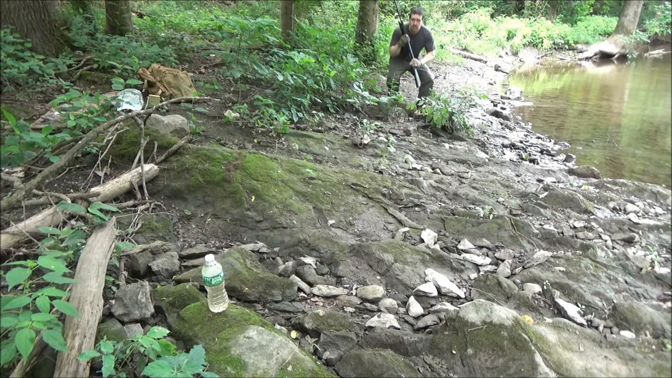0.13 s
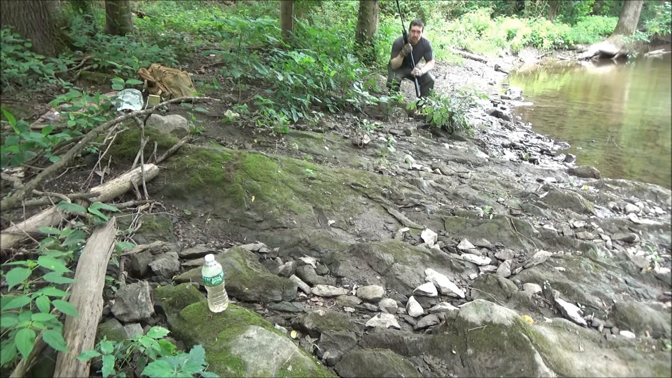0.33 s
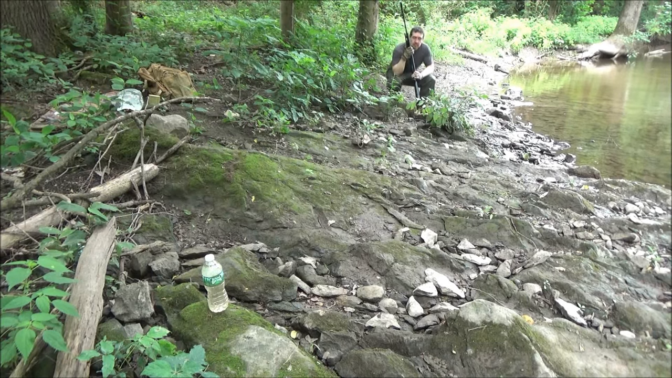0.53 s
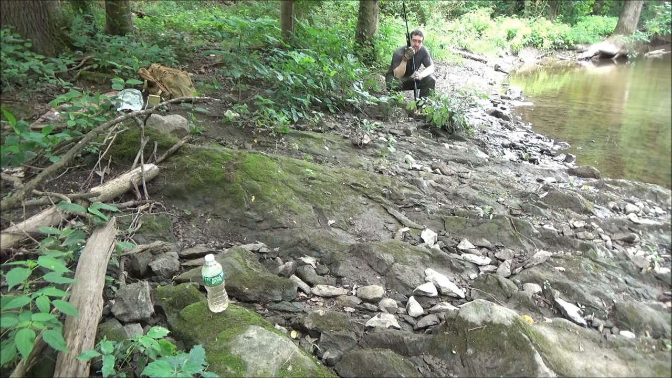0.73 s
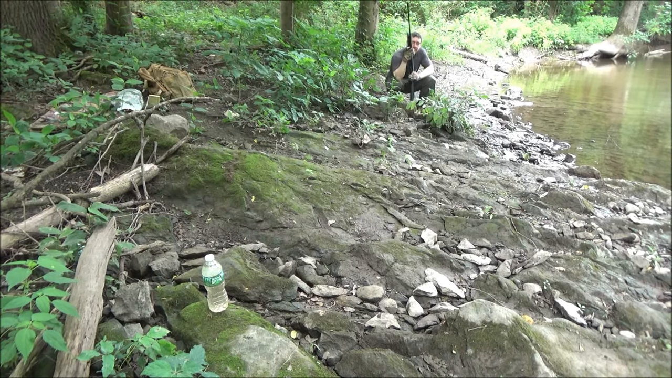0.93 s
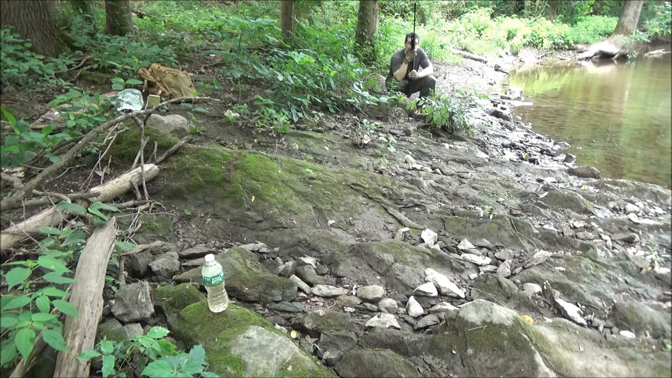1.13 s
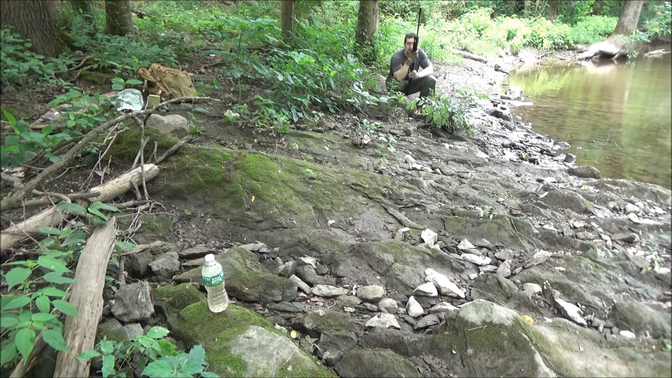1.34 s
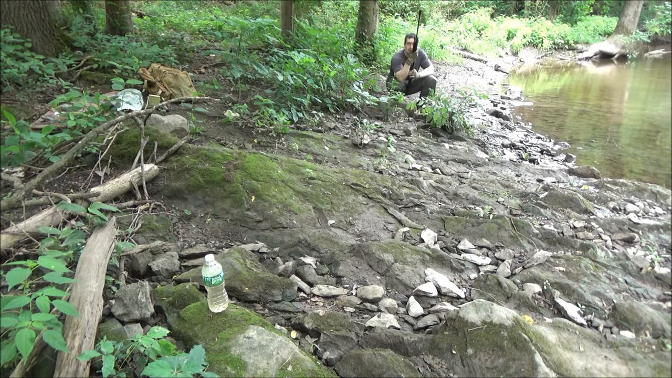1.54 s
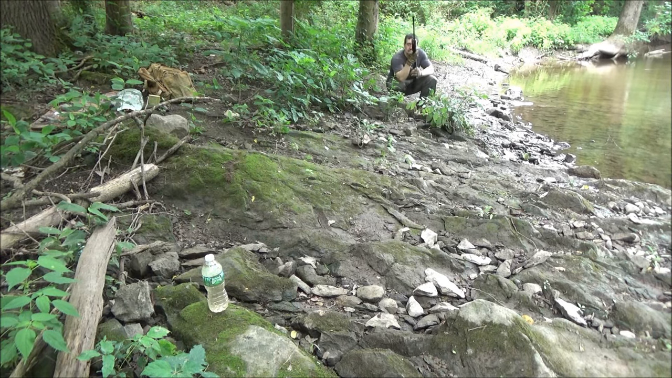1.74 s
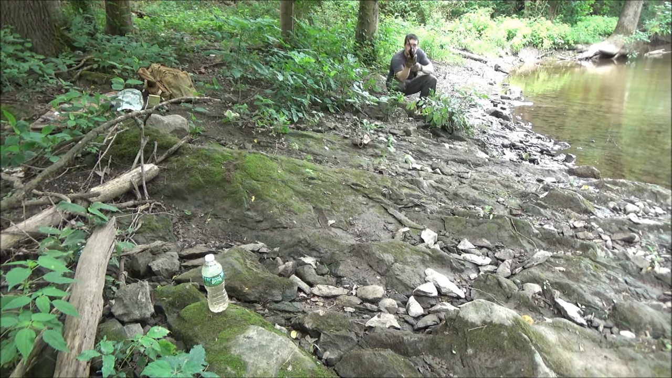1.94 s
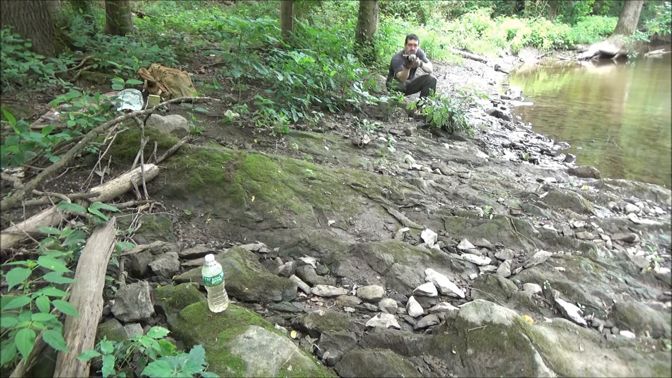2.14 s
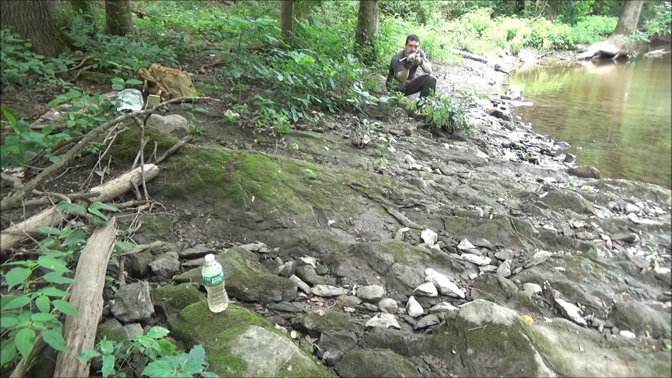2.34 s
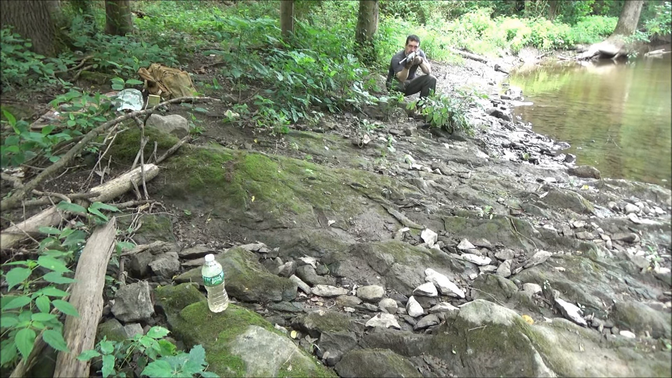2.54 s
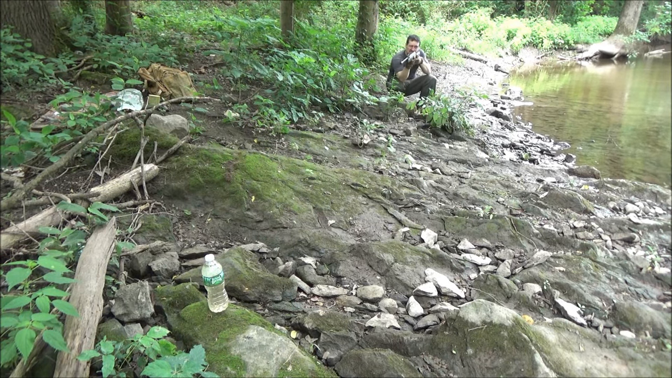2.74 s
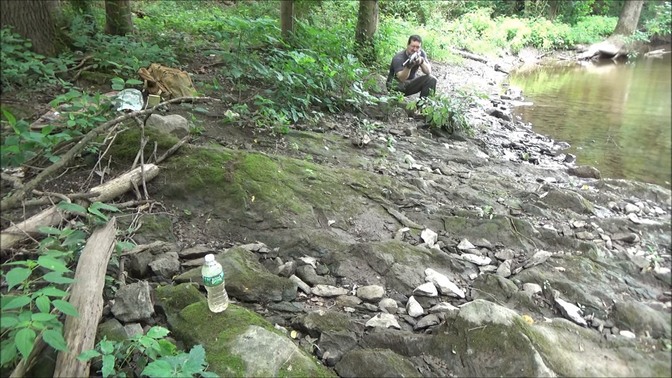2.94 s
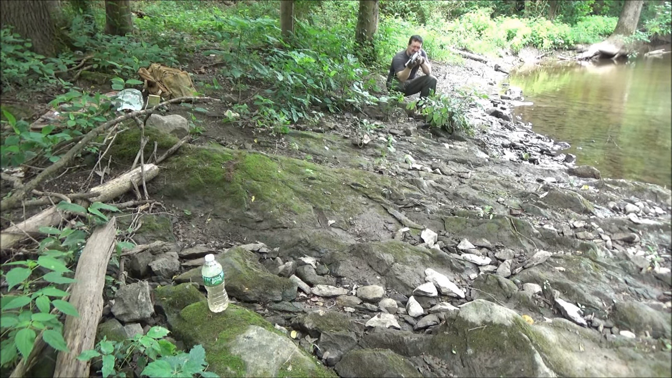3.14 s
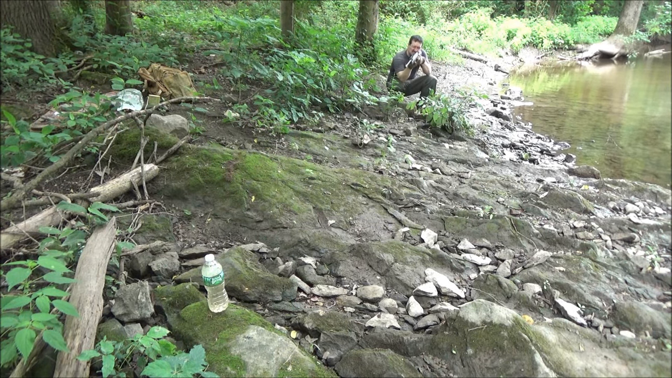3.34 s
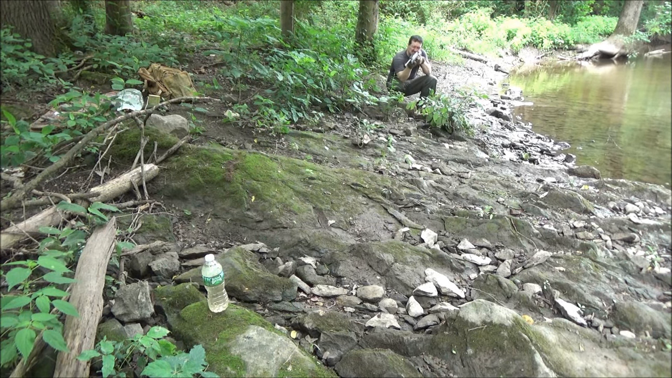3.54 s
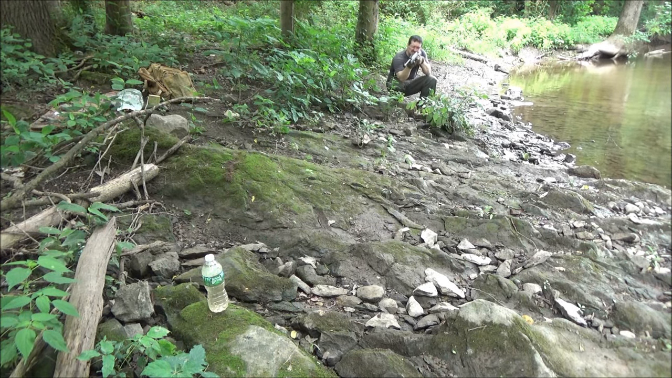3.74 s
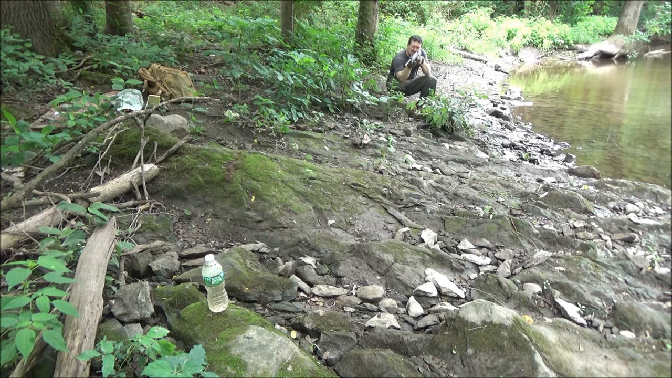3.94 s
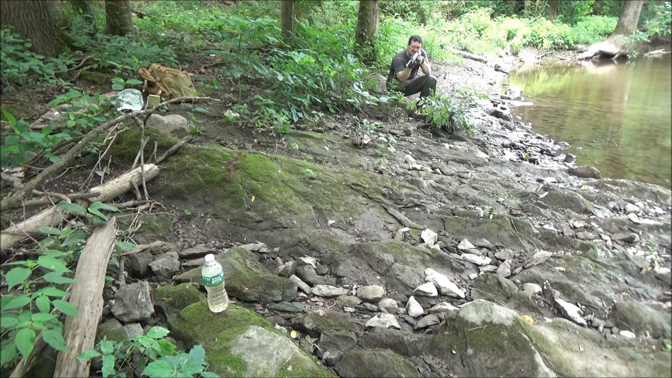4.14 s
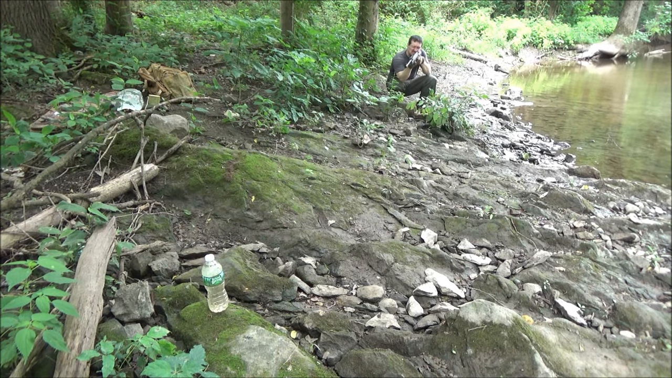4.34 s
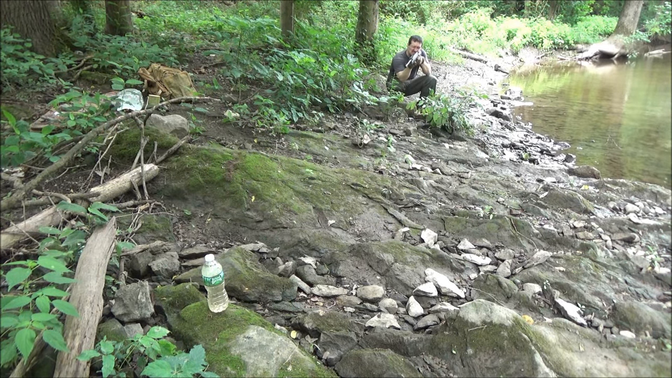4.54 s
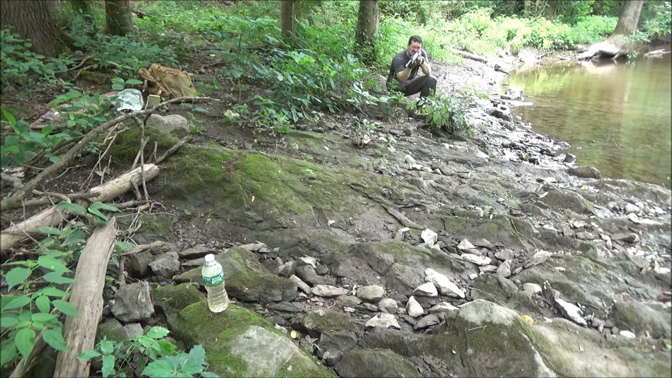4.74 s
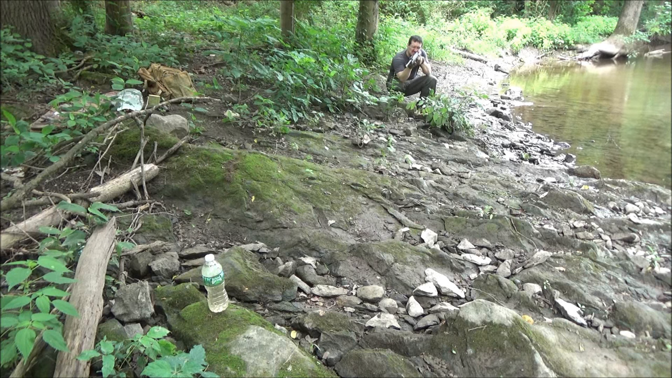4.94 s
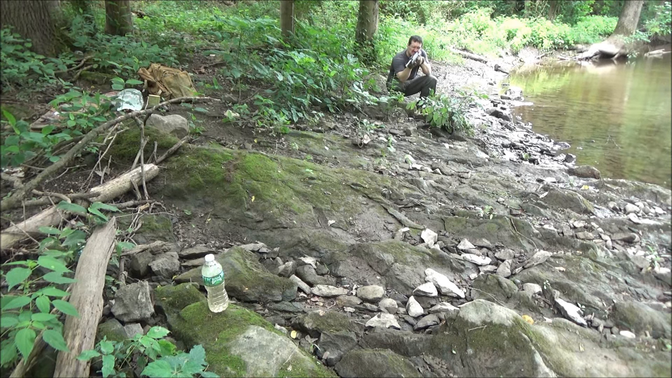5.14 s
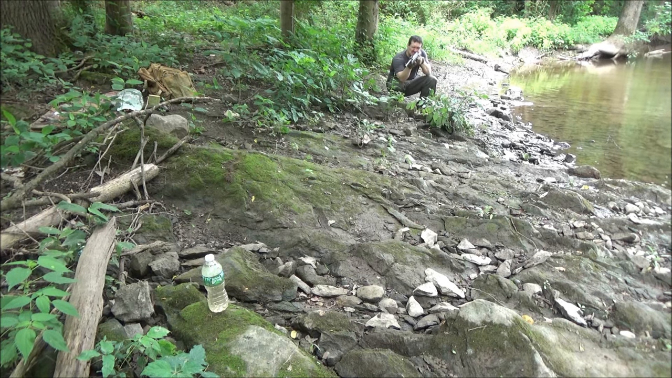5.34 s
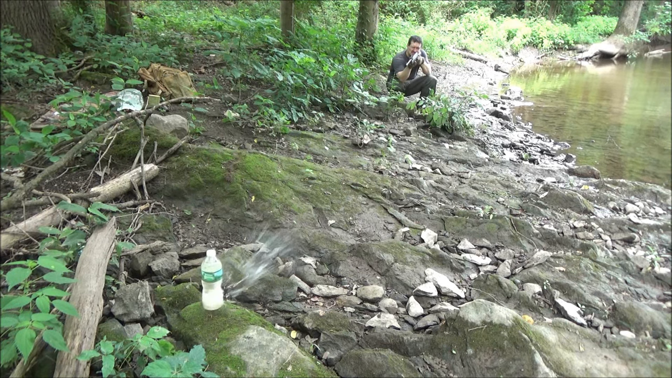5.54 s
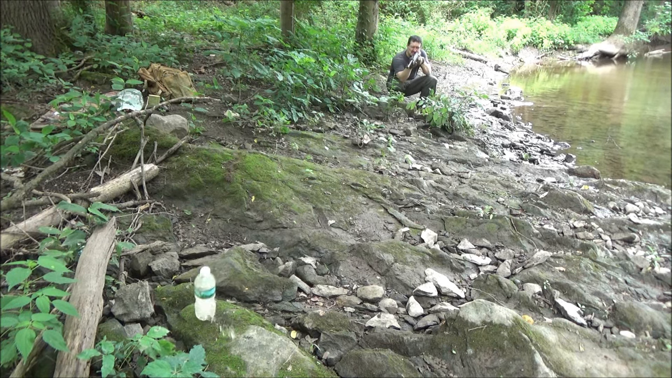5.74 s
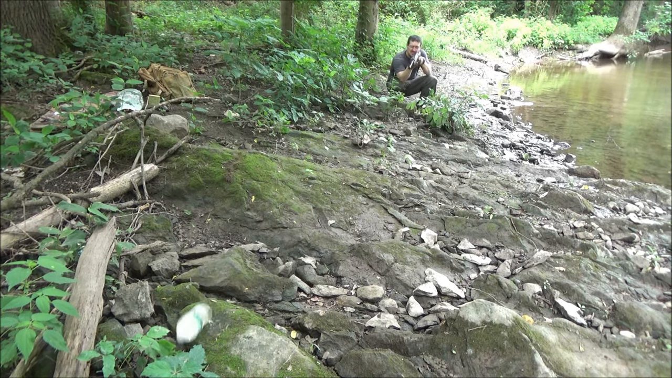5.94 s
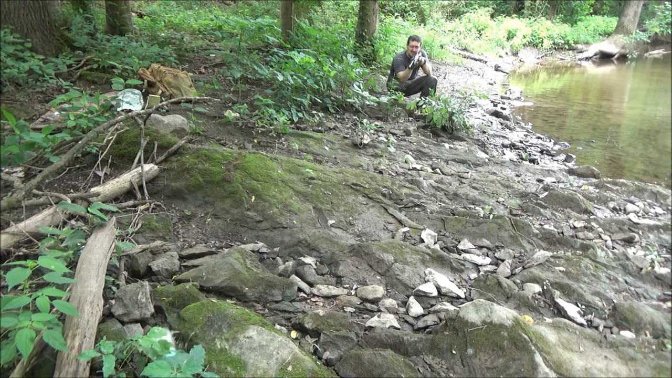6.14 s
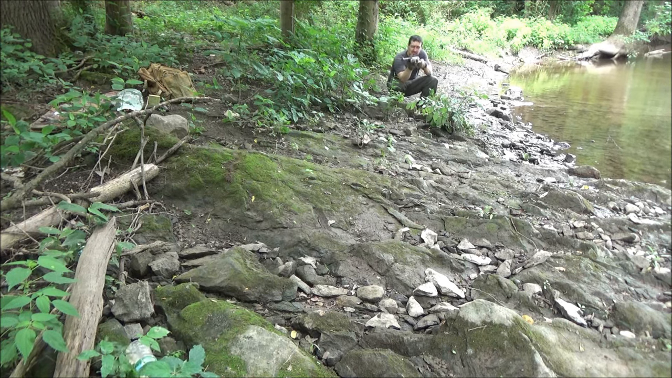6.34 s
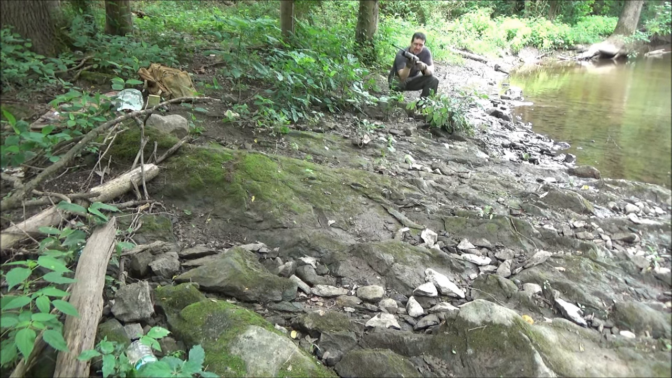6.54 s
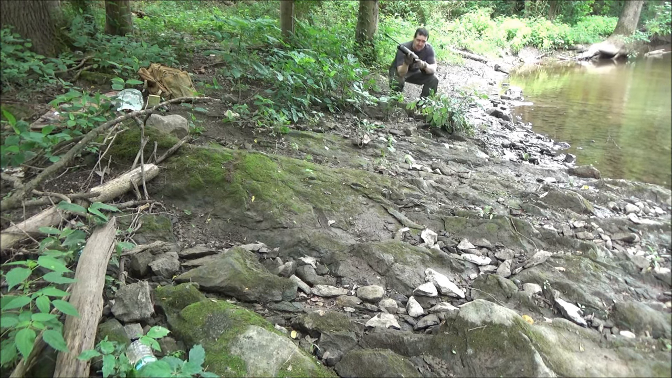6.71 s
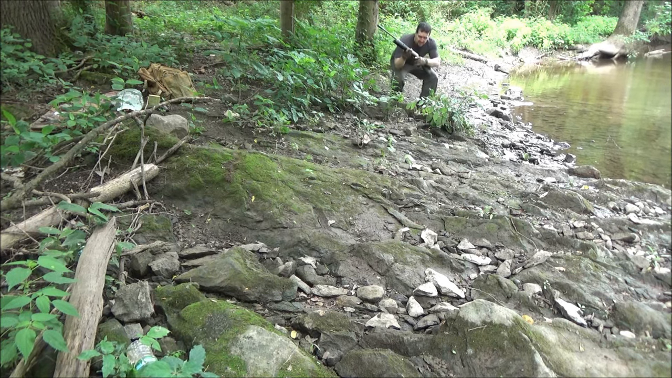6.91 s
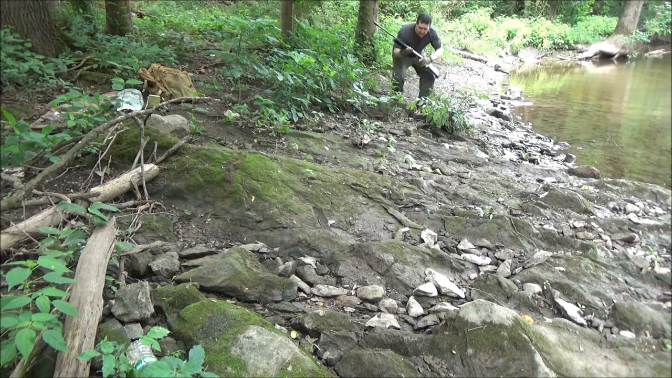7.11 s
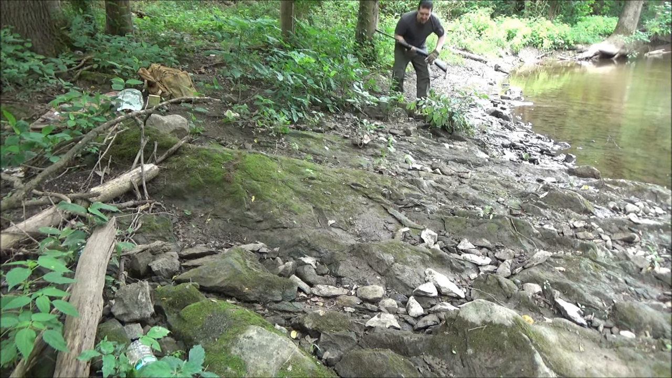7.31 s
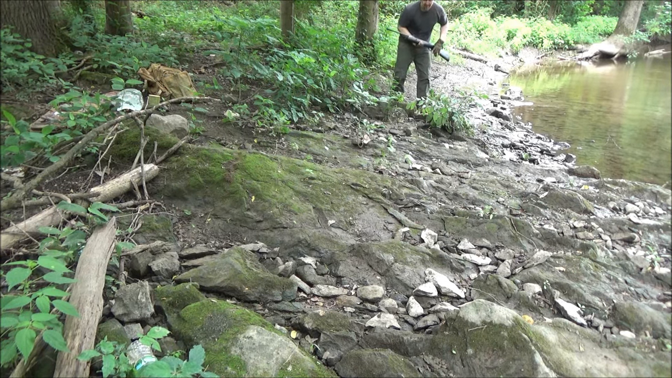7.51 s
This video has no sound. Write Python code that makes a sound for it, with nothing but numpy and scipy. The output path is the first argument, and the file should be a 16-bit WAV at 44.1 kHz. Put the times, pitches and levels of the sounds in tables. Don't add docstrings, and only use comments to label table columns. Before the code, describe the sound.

A steady creek rush and echoing woodland birds, then a violent clipped air rifle crack, a plastic bottle rattling over stone, fine spray and drips.

```python
import sys
import numpy as np
from scipy import signal
from scipy.fft import rfft, irfft, next_fast_len
from scipy.io import wavfile
from scipy.ndimage import uniform_filter1d, map_coordinates

SR = 44100
rng = np.random.default_rng(int(sys.argv[2]) if len(sys.argv) > 2 else 0)


def bounce(signal):
    frames = np.transpose(np.atleast_2d(signal))
    limited = np.clip(frames, -1, 1)
    pcm = np.round(limited * 32767).astype(np.int16)
    wavfile.write(sys.argv[1], SR, pcm)


def boost(x):
    u = np.asarray(x, float) / 20
    return 10 ** u


N = 333837


def unit(x):
    return x / np.sqrt(np.mean(x ** 2) + 1e-20)


def along(points, hz):
    f, v = np.transpose(points)
    return np.interp(np.log(hz + 1), np.log(f + 1), v)


def add(track, start_s, sound):
    part = track[round(start_s * SR):][:len(sound)]
    part += sound[:len(part)]


def filtered(x, response):
    m = next_fast_len(len(x) + 4096)
    return irfft(rfft(x, m) * response(np.fft.rfftfreq(m, 1 / SR)), m)[:len(x)]


def resonance(hz, centre_hz, width_hz):
    return 1j * hz * width_hz / (centre_hz ** 2 - hz ** 2 + 1j * hz * width_hz)


def wobble(length, rate_hz):
    knots = rng.standard_normal(int(length * rate_hz / SR) + 4)
    return map_coordinates(knots, [np.arange(length) * rate_hz / SR])


def lumpy(shape, bins, frames):
    field = uniform_filter1d(rng.standard_normal(shape), size=bins, axis=0)
    return unit(uniform_filter1d(field, size=frames, axis=1))


def dying_noise(t60s, patchy_db, length):
    hz, t, z = signal.stft(rng.standard_normal(length), SR, nperseg=256, noverlap=128)
    level_db = patchy_db * lumpy(z.shape, 8, 5) - 60 * t / along(t60s, hz)[:, None]
    return signal.istft(z * boost(level_db), SR, nperseg=256, noverlap=128)[1]


# (freq_hz, t60_s)
WOOD_T60 = [(300, 0.66), (2000, 1.16), (6500, 1.13), (12000, 0.59)]


def in_wood(track, start_s, sound, wet_db):
    tail = dying_noise(WOOD_T60, patchy_db=0.5, length=3 * SR // 4)
    add(track, start_s, sound)
    add(track, start_s + .004, boost(wet_db) * signal.fftconvolve(sound, tail / np.linalg.norm(tail)))


# (freq_hz, density_db per Hz)
RUSH_COLOUR = [(15, -43), (25, -13.5), (70, -4), (120, -7), (149, -3.5), (429, -9.5), (466, -8), (594, -5),
               (917, -0.5), (2710, -10.5), (2940, -7.5), (4180, -27), (5940, -29), (8000, -34.5),
               (16200, -38.5)]
# (time_s, level_db)
FLOW = [(0, 1), (.6, .5), (2, -.5), (3.5, -.5), (4.5, -1), (5.3, 0), (6.3, -1), (6.6, -1.5), (7.57, 0)]


def creek():
    z = signal.stft(rng.standard_normal(N + 512), nperseg=512)[2]
    rush = signal.istft(z * boost(0.88 * lumpy(z.shape, 5, 10)), nperseg=512)[1][:N]
    hiss_bump = lambda hz: 1 + .5 * abs(resonance(hz, 6084, 1160)) ** 2
    rush = unit(filtered(rush, lambda hz: boost(along(RUSH_COLOUR, hz)) * hiss_bump(hz)))

    count, length = 6000, 700
    start = (rng.random((count, 1)) * N).astype(int) + np.arange(length)
    pitch_hz = 950 * np.exp(0.391 * rng.standard_normal((count, 1)))
    size = boost(3 * rng.exponential(size=(count, 1)))
    cycles = pitch_hz * np.arange(length) / SR
    ring = np.sin(2 * np.pi * cycles * (1 + .012 * cycles))
    bubble = size * cycles * np.exp(-cycles / 2.25) * ring
    babble = unit(np.bincount(start.ravel(), bubble.ravel())[:N])

    flow_db = np.interp(np.arange(N) / SR, *np.transpose(FLOW))
    return (boost(-18.0) * rush + boost(-29.5) * babble) * boost(flow_db)


# (freq_hz, rms_db)
WHINE = [(63, -43), (15734, -63)]


def whine():
    t = np.arange(N) / SR
    return sum(np.sqrt(2) * boost(db) * np.sin(2 * np.pi * hz * t) for hz, db in WHINE)


def song(notes, slide, waver, flutter_db, wet_db):
    out = np.zeros(N)
    for start_s, length_s, middle_hz, level_db in notes:
        shake, flutter = wobble(SR // 2, 150), wobble(SR // 2, 55)
        u = np.linspace(0, 1, round(length_s * SR))
        arch = 0.01487 * (2 * u - 1) ** 2
        hz = middle_hz * (1 + slide * (u - .5) - arch + waver * shake[:len(u)])
        swell = np.sin(np.pi * u) ** .5 * unit(boost(flutter_db * flutter[:len(u)]))
        note = swell * np.sin(2 * np.pi * np.cumsum(hz) / SR)
        in_wood(out, start_s, boost(level_db + 4.5) * note, wet_db)
    return out


FALL, RISE = 0.1344, 0.122
FALLING = [(.308, 0.0254, 3135, -21), (1.206, 0.0233, 3160, -24), (1.717, 0.027, 3000, -23.5),
           (1.754, 0.022, 2953, -19.5), (1.928, .045, 2760, -24), (2.848, .032, 2980, -22.5),
           (2.95, .04, 2620, -21.5), (3.296, 0.02, 3180, -21.5), (3.597, 0.0366, 2915, -22.5),
           (3.828, 0.0271, 3260, -22.5), (4.227, .048, 2380, -28), (4.755, 0.033, 3153, -22.5),
           (4.9, .07, 7500, -38), (5.219, 0.036, 2630, -28)]
RISING = [(1.275, 0.028, 3200, -32.5), (1.992, 0.088, 2666, -25), (2.419, 0.1076, 2353, -24.5),
          (3.421, 0.0426, 3350, -29.5), (3.885, 0.024, 3180, -22), (4.103, 0.09, 2518, -27),
          (5.05, .025, 8400, -41), (5.56, .042, 2900, -21.5)]
HELD = [(.09, 0.019, 3250, -25), (.122, 0.0174, 3310, -28), (.258, 0.021, 3210, -19.5),
        (1.075, 0.11, 2550, -23), (1.79, .03, 2765, -29), (1.832, 0.0308, 2740, -25),
        (1.965, 0.025, 2560, -20), (2.619, 0.054, 2415, -30), (2.692, 0.0504, 3400, -27),
        (2.804, 0.0142, 3060, -22), (2.905, 0.035, 2870, -19.5), (2.99, .1, 2537, -28.5),
        (3.032, 0.077, 2869, -29), (3.49, 0.093, 3490, -37), (3.74, .042, 3485, -34),
        (4.2, 0.126, 2580, -29), (4.83, .033, 3320, -28.5), (5.155, .065, 2885, -26.5)]
SEEPS = [(1.869, .06, 5930, -43.5), (2.906, .08, 6940, -50), (3.28, 0.107, 7080, -45),
         (3.503, 0.45, 7790, -50), (4.479, .16, 7100, -54), (4.81, .05, 8950, -50),
         (4.954, 0.153, 7185, -35.5), (7.17, .06, 7450, -49), (7.38, .18, 7400, -52)]
TRILLS = [(.04, .075, 4130, -44.5), (.09, .071, 4390, -51.5), (.21, 0.081, 4100, -44),
          (.29, .06, 3110, -29), (1.26, 0.039, 3200, -29.5), (2.63, 0.063, 4150, -43),
          (2.99, 0.147, 4050, -42), (3.83, 0.11, 3400, -34), (4.83, 0.074, 3240, -33),
          (5.5, 0.059, 3820, -38.5)]
SINKING = [(2.69, 0.0514, 3800, -38), (2.74, 0.067, 3520, -31.5), (3.24, 0.04236, 3100, -24.5),
           (4.74, .05, 3820, -38)]


def birds():
    clear = dict(waver=.008, flutter_db=2.5, wet_db=-1.5)
    warbling = dict(waver=.045, flutter_db=5, wet_db=2)
    whistler = song(FALLING, -FALL, **clear) + song(RISING, RISE, **clear) + song(HELD + SEEPS, 0, **clear)
    return whistler + song(TRILLS, 0, **warbling) + song(SINKING, -FALL, **warbling)


# (start_s, peak_db, top_hz)
CHIPS = [(0.736, -12.5, 6485), (2.079, -10.5, 6561), (2.4877, -11.5, 6600), (3.364, -12.5, 6520),
         (4.8822, -12, 6370)]


def chips():
    out, u = np.zeros(N), np.linspace(0, 1, 1000)
    slur = 1 - .065 * (1 + np.cos(np.pi * np.clip(u / .65, 0, 1))) - .3 * np.exp(-u / .042)
    swell = np.sin(np.pi * u) ** 0.64 * boost(7.42 * (u - 1))
    for start_s, peak_db, top_hz in CHIPS:
        phase = 2 * np.pi * np.cumsum(top_hz * slur) / SR
        lines = np.sin(phase) + boost(-6.5) * np.sin(phase / 2) + boost(-33) * np.sin(3 * phase / 2)
        run_up = np.sin(2 * np.pi * np.cumsum(top_hz * (0.5 + 2.2 * u)) / SR)
        call = swell * lines + boost(-14) * np.exp(-(u / .07 - 1) ** 2) * run_up
        in_wood(out, start_s - .012, boost(peak_db - 6.5) * call, wet_db=12.0)
    return out


# (start_s, peak_db, centre_hz, width_share of centre, echo_db)
SNAPS = [(1.95, -40, 12000, .5, 8), (2.04, -28, 4400, .35, 3.5), (4.045, -30, 9000, .5, -5),
         (5.0227, -5, 3150, 0.17, -14), (5.023, -33, 8000, 1.2, -10), (6.736, -7, 2300, .3, 0),
         (6.735, -7.5, 4770, .9, 0)]


def snaps():
    out, t = np.zeros(N), np.arange(SR // 50) / SR
    for start_s, peak_db, centre_hz, width_share, echo_db in SNAPS:
        burst = boost(-60 * t / .014) * rng.standard_normal(len(t))
        burst = filtered(burst, lambda hz: resonance(hz, centre_hz, width_share * centre_hz) ** 2)
        in_wood(out, start_s, boost(peak_db) * burst / np.abs(burst).max(), echo_db)
    return out


# (start_s, ring_db, ring_hz, t60_s, crack_db)
SHOT = [(5.618, 6.5, 1147, .039, -22), (5.62, 1, 2575, .042, -4), (5.622, 5.5, 5652, 0.048, 1),
        (5.6246, 5, 6100, .016, -2), (5.6294, 24.5, 2487, 0.0118, 18), (5.6377, 28.5, 1590, 0.0055, 21.5),
        (5.6403, 6, 2800, .03, 0.5)]
# (start_s, level_db)
PUSHES = [
    (5.6294, 24.5),
    (5.6382, 10),
]
# (freq_hz, density_db per Hz)
ROLL_COLOUR = [(88, -57), (150, -26), (392, -10), (557, -10.5), (627, -8), (983, -6.5), (1130, -6.5),
               (3380, 3), (4030, -8), (6200, -3), (16200, -21)]
# (freq_hz, t60_s)
ROLL_T60 = [(300, 2.86), (1500, 2.1), (3000, 1.6), (7000, 1.27), (14000, 0.74)]


def shot():
    out, t = np.zeros(N), np.arange(SR // 10) / SR
    for start_s, ring_db, ring_hz, t60_s, crack_db in SHOT:
        noise = rng.standard_normal((2, len(t)))
        wander = 1.13 * np.cumsum(noise[0]) * np.sqrt(ring_hz / SR)
        ring = np.sin(2 * np.pi * ring_hz * t + wander)
        crack = filtered(noise[1], lambda hz: resonance(hz, 4600, 7000))
        blow = boost(ring_db) * ring + boost(crack_db) * crack
        add(out, start_s, blow * boost(-60 * t / t60_s) * (1 - np.exp(-t / 0.00063)))
    for start_s, level_db in PUSHES:
        add(out, start_s, -boost(level_db) * (1 - t / 0.00054) * np.exp(-t / 0.00041))

    roll = dying_noise(ROLL_T60, patchy_db=1.4, length=2 * SR)
    roll = filtered(roll, lambda hz: boost(along(ROLL_COLOUR, hz)))
    onset = 1 - np.exp(-np.arange(len(roll)) / SR / 0.0022)
    add(out, 5.641, boost(7) * roll / np.std(roll[:SR // 10]) * onset)
    thump = np.sin(2 * np.pi * 70 * t) * boost(-60 * t / 0.068)
    add(out, 5.639, boost(3) * thump)
    return out


# (start_s, peak_db)
TICKS = [(6.0222, -29), (6.0716, -25.5), (6.2387, -34.5), (6.3195, -34), (6.3465, -34), (6.3894, -37),
         (6.4294, -39), (6.4517, -39), (6.5046, -37), (6.5194, -45), (6.5645, -43), (6.6129, -37),
         (6.6383, -35), (7.0254, -37), (7.2479, -34), (7.3294, -50.5)]


def ticks():
    out, t = np.zeros(N), np.arange(SR // 50) / SR
    for start_s, peak_db in TICKS:
        burst = boost(peak_db + 20.5 - 60 * t / 0.005) * rng.standard_normal(len(t))
        add(out, start_s, filtered(burst, lambda hz: resonance(hz, 12500, 5000) ** 2))
    return out


def spray():
    start_s, level_db, t60_s = 6.09, -33.5, 2.7
    since = np.arange(N) / SR - start_s
    drops = (rng.random(N) < .08) * rng.standard_normal(N) * boost(3 * wobble(N, 60))
    fizz = unit(filtered(drops, lambda hz: resonance(hz, 11500, 11000) ** 2))
    return fizz * np.clip(since / .15, 0, 1) * boost(level_db - 60 * np.maximum(since, 0) / t60_s)


# (centre_hz, width_hz, level_db)
SHELL_MODES = [(340, 105, 1), (673, 140, 2), (889, 178, 1.5), (1460, 168, 0), (1760, 150, -4.5),
               (2110, 140, 0), (2515, 250, -2), (2980, 150, -1.5), (4530, 1600, -16)]
# (start_s, knock_db, spot_hz, crackle_db)
KNOCKS = [(6.13, 1, 2070, -6), (6.141, 6, 1550, -10), (6.151, -1.5, 592, -19), (6.157, 2.5, 783, 0.5),
          (6.161, 1.5, 2430, -15), (6.165, 1, 1530, -25), (6.174, -2, 1460, -18), (6.177, 3, 1340, -14.5),
          (6.187, -10, 428, -12), (6.195, -8.5, 1420, -23), (6.212, -11.5, 1490, -30),
          (6.264, -5, 1500, -16), (6.269, -4, 650, -16), (6.273, -6, 2300, -17), (6.277, -7.5, 2020, -20),
          (6.281, -6, 1500, -7), (6.29, -9, 869, -22)]


def shell(hz):
    total = 0
    for k, (centre_hz, width_hz, level_db) in enumerate(SHELL_MODES):
        total = total + (-1) ** k * boost(level_db) * resonance(hz, centre_hz, width_hz)
    return total


def bottle():
    out, t = np.zeros(N), np.arange(SR // 20) / SR
    rebounds = [(s + .0045, knock_db - 9, 900, crackle_db - 8.5) for s, knock_db, _, crackle_db in KNOCKS]
    for start_s, knock_db, spot_hz, crackle_db in KNOCKS + rebounds:
        ragged = boost(-60 * t / 0.023) * rng.standard_normal(len(t))
        knock = unit(ragged + boost(12.5) * (t == 0))
        struck = lambda hz: .5 + 0.65 * resonance(hz, spot_hz, 0.56 * spot_hz)
        knock = filtered(knock, lambda hz: shell(hz) * struck(hz))
        add(out, start_s + .0005, boost(knock_db + 11.0) * knock / np.abs(knock).max())

        centre_hz = 8500 * np.exp(.25 * rng.standard_normal())
        crackle = boost(-60 * t / 0.006) * rng.standard_normal(len(t))
        crackle = filtered(crackle, lambda hz: resonance(hz, centre_hz, 0.97 * centre_hz))
        add(out, start_s + .0015, boost(crackle_db + 4.5) * crackle / np.abs(crackle).max())
    return out


# (start_s, length_s, middle_hz, level_db)
PLINKS = [(6.803, 0.0087, 3950, -26.5), (6.933, 0.0067, 2650, -16.5), (6.942, 0.0062, 3485, -18.5)]


def plinks():
    return song(PLINKS, slide=.05, waver=0, flutter_db=0, wet_db=-14)


def scene():
    mono = creek() + whine() + birds() + chips() + snaps()
    mono = mono + shot() + ticks() + spray() + bottle() + plinks()
    return np.array([mono, mono])


def gain_db():
    duck_s, duck_db, sag_s, sag_db, slam_s, slam_db = 5.593, -9.5, 5.641, -14.5, 5.646, -31.5
    spring_s, rest_db, creep_db_per_s = 0.048, -16.5, 2.5
    t = np.arange(N) / SR
    times_s = [duck_s - .003, duck_s, SHOT[0][0], sag_s, slam_s]
    before = np.interp(t, times_s, [0, duck_db, duck_db, sag_db, slam_db])
    since = np.maximum(t - slam_s, 0)
    after = rest_db + creep_db_per_s * since + (slam_db - rest_db) * np.exp(-since / spring_s)
    return np.where(t < slam_s, before, after)


# (freq_hz, level_db relative to the sum)
APART = [(5000, -50), (7000, -28), (8500, -17), (12000, -13.5), (15000, -13.5)]


def widened(x):
    side = np.roll(filtered(x, lambda hz: boost(along(APART, hz))), 300)
    return np.array([x + side, x - side])


def roll_off(x):
    return signal.sosfilt(signal.butter(12, 16330, fs=SR, output="sos"), x)


def record(dry):
    clipped = np.clip(dry[0] * boost(gain_db()), -.92, .92)
    mix = widened(filtered(clipped, lambda hz: hz < 16050))
    return roll_off(mix)


dry = scene()
out = record(dry)
bounce(out)
```